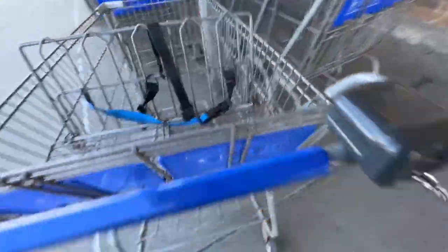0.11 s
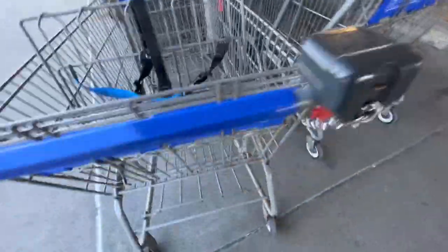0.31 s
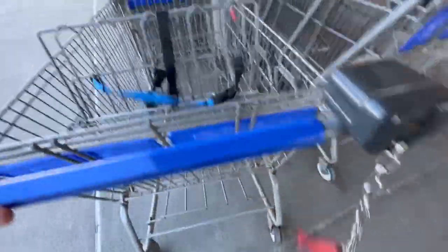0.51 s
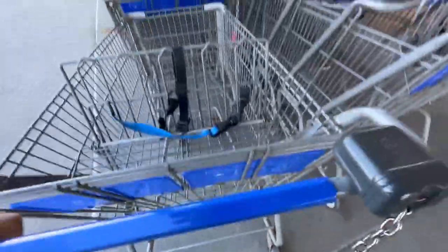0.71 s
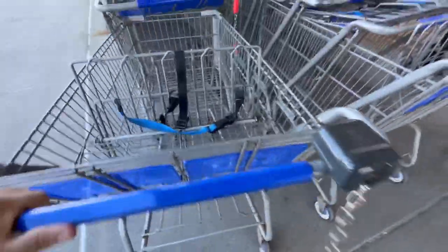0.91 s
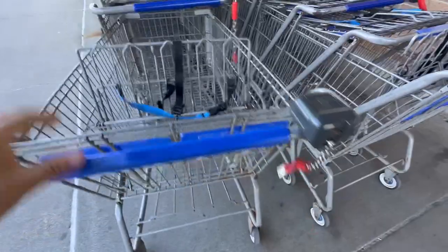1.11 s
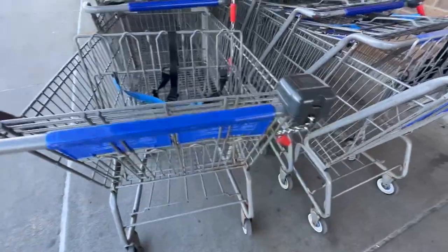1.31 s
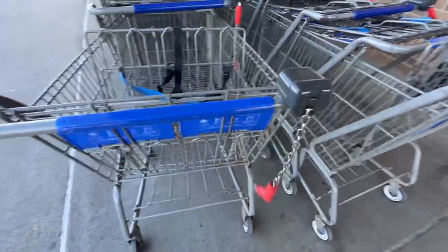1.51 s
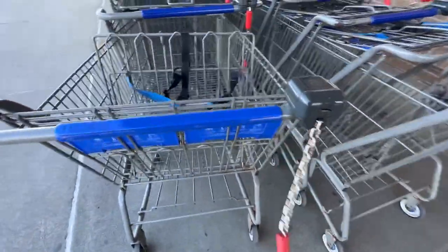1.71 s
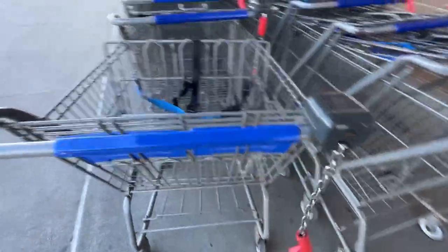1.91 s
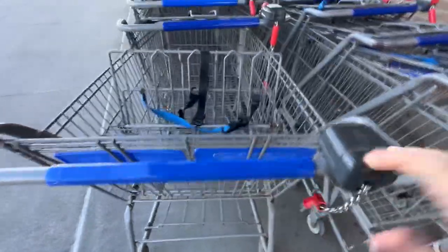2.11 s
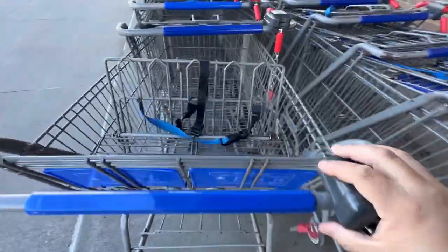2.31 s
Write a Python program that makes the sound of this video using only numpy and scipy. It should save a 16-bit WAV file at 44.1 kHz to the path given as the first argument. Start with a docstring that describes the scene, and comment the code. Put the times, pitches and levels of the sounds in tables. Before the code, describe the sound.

A wire shopping cart slams into a row of nested carts, rattles hard, then its chain clinks

```python
"""A steel wire shopping cart rolls on concrete with a low wheel drone, close to the microphone.
At 0.22 s it bangs into a row of nested carts and rattles; near 0.9 s it is pushed home in a second clatter.
A finger cups the right port: its resonance fades over 1.6-1.8 s, a slip hiss and bump follow at 1.92 s.
A wheel hum swells to 1.9 s; the lock chain, faint at 1.78 s, clinks clearly at 2 s and dies in lesser knocks.
Metal is noise bursts and decaying modes; wheels, hum and air are filtered noise."""
import sys
import numpy as np
from scipy import signal
from scipy.fft import rfft, irfft, next_fast_len
from scipy.io import wavfile

SR = 44100
rng = np.random.default_rng(int(sys.argv[2]) if len(sys.argv) > 2 else 0)


def wrap_up_sound(samples):
    """Save the sound to the file named by the first command line argument, as 16-bit audio."""
    columns = np.atleast_2d(samples).T
    # keep every value between -1 and 1, then stretch to whole-number steps
    tamed = np.clip(columns, -1, 1)
    steps = np.round(tamed * 32767).astype(np.int16)
    wavfile.write(sys.argv[1], SR, steps)


N = 105840
T = np.arange(N) / SR  # s

# Cart shaking. Each row: time in s, then relative levels in dB of frame bars, basket wires, finest treble.
SHAKE = [(0.0, -53.5, -53.5, -53), (0.21, -59.5, -53, -53), (0.222, -31, -46, -45),
         (0.232, -24.5, -30, -31), (0.254, -43, -26, -21), (0.27, -36, -26, -23), (0.412, -23, -25, -24),
         (0.456, -28.5, -27, -29), (0.51, -21.5, -24, -22.5), (0.694, -29.5, -28.5, -28),
         (0.846, -38, -41, -45.5), (0.884, -41.5, -40, -33), (0.896, -33, -32, -23),
         (0.906, -31, -32.5, -43), (0.966, -31.5, -33, -32), (0.982, -25, -25.5, -19),
         (1.026, -25.5, -25, -27), (1.156, -32.5, -32.5, -30.5), (1.166, -31.5, -30.5, -24),
         (1.178, -28, -29.5, -28), (1.21, -29, -32, -34), (1.248, -31.5, -32, -27.5),
         (1.264, -33, -33, -31), (1.314, -32, -32, -30.5), (1.384, -36.5, -36, -39.5),
         (1.472, -40, -44.5, -49), (1.618, -45, -46.5, -55), (1.754, -56.5, -60, -80),
         (1.786, -69, -51.5, -58), (1.856, -68, -59.5, -80), (1.884, -53, -51, -70),
         (1.95, -45.5, -54, -77)]
# Cart striking cart. Each row: start in s, clang level in dB, thud level in dB.
BLOWS = [(0.222, -33, -46), (0.2306, -15.5, -10), (0.251, -28.5, -33), (0.332, -16, -36),
         (0.499, -18.5, -45), (0.521, -19, -19.5), (0.544, -20, -24.5), (0.907, -23, -48),
         (0.978, -19.5, -32), (0.997, -18, -32)]
# Rumble spectrum, also the finger bump. Each row: frequency in Hz, relative density in dB per Hz.
RUMBLE = [(20, -39), (36, -26), (52, -3), (80, 2.5), (120, -9.5), (200, -9.5), (400, -76), (2000, -68)]


def amp(db):
    """Decibels to gain."""
    return 10 ** (np.asarray(db) / 20)


def evened(x):
    """Scales to rms 1."""
    return x / np.sqrt(np.mean(x ** 2) + 1e-20)


def read(points, hz):
    """Reads a table on a log-frequency axis."""
    f, value = np.transpose(points)
    return np.interp(np.log(hz + 1), np.log(f + 1), value)


def curve(table, axis):
    """One column of a time table, for every sample."""
    rows = np.array(table)
    return np.interp(T, rows[:, 0], rows[:, axis])


def add(mix, start_s, sound):
    """Adds a stereo sound in place, cut at the end of the mix."""
    part = mix[:, round(start_s * SR):][:, :sound.shape[1]]
    part += sound[:, :part.shape[1]]


def filtered(x, gain):
    """Filters by a function of frequency."""
    size = next_fast_len(2 * x.shape[-1])
    spectrum = rfft(x, size) * gain(np.fft.rfftfreq(size, 1 / SR))
    return irfft(spectrum, size)[..., :x.shape[-1]]


def coloured(x, points):
    """Gives x a spectrum, at rms 1."""
    return evened(filtered(x, lambda hz: amp(read(points, hz))))


def resonant(x, centre_hz, width_hz):
    """x through one steep resonance, at rms 1."""
    return evened(filtered(x, lambda hz: 1 / (1 + ((hz - centre_hz) / width_hz) ** 4)))


def noise(length):
    """Unrelated white noise for two channels."""
    return rng.standard_normal((2, length))


def ring(modes):
    """Half a second of decaying modes, reaching each port with its own phase."""
    t, out = T[:SR // 2], 0
    for hz, db, t60_s in modes:
        decay = amp(db - 60 * t / np.clip(t60_s, .02, .9))
        out = out + decay * np.sin(2 * np.pi * (hz * t + rng.random((2, 1))))
    return out


def mesh(t60_s, spread_db, count):
    """The ring of a welded mesh: very many modes of random pitch and strength."""
    size = SR // 2
    lines = np.zeros((2, size // 2 + 1), complex)
    bins = rng.integers(50, 8000, count)  # 2 Hz apart: 100 Hz to 16 kHz
    strength = amp(spread_db * rng.standard_normal(count).clip(-2, 2))
    lines[:, bins] = strength * np.exp(2j * np.pi * rng.random((2, count)))
    return evened(irfft(lines, size)) * amp(-60 * T[:size] / t60_s)


def shake_gain(axis):
    """Gain of one SHAKE column; the shaking dies away after the last point."""
    settle_db_per_s = 39.5
    return amp(curve(SHAKE, axis) - settle_db_per_s * np.maximum(T - SHAKE[-1][0], 0))


def paired(x):
    """Stereo width by frequency: bass nearly mono, middle and most treble wide, top nearly mono."""
    # Each row: frequency in Hz, channel likeness (clipped to -1..1): 1 is mono, 0 is wide,
    # negative is out of phase.
    likeness = [(100, 0.93), (220, 0.87), (450, 0.39), (800, -0.28), (1200, -0.073), (2200, 0.13),
                (3000, -0.08), (4000, 0.041), (10000, 0.044), (10900, -1.083), (12300, -1.24),
                (13200, 0.93), (16000, 0.79)]
    mid = filtered(x[0], lambda hz: np.sqrt((1 + read(likeness, hz).clip(-1, 1)) / 2))
    side = filtered(x[1], lambda hz: np.sqrt((1 - read(likeness, hz).clip(-1, 1)) / 2))
    return np.array([mid + side, mid - side])


def air(level_db=-47):
    """Car park air: steady noise, mostly low."""
    # Each row: frequency in Hz, relative density in dB per Hz.
    air_spectrum = [(20, -20), (60, 8.5), (350, 3.5), (800, -9.5), (1500, -6), (3000, -29), (6000, -43),
                    (10000, -68), (16000, -60)]
    return amp(level_db) * coloured(noise(N), air_spectrum)


def wheels(drone_db=0, rumble_db=-1, rumble_top_db=-32):
    """Hard wheels on rough concrete drive the low resonances of the frame."""
    # Each row: time in s, drone level in dB, rumble level in dB (before cap and trim).
    roll = [(0.0, -43, -60), (0.15, -42.5, -65), (0.21, -44, -48), (0.23, -22, -33), (0.28, -29.5, -27),
            (0.33, -31.5, -40), (0.35, -26, -30), (0.47, -37, -39), (0.54, -31, -42), (0.63, -41, -45),
            (0.65, -33.5, -44), (0.81, -43, -42), (1.0, -36, -45), (1.56, -36.5, -40), (1.93, -35.5, -46),
            (2.27, -43.5, -42), (2.28, -41, -43.5), (2.4, -43.5, -38)]
    # Each row: frequency in Hz, relative density in dB per Hz.
    drone_spectrum = [(100, -6), (190, 4), (270, -12), (365, 5), (440, 0.5), (530, -8.5), (670, 2.5),
                      (850, -2.5), (1100, -8.5), (2000, -20), (5000, -51), (16000, -65)]
    drone = amp(curve(roll, axis=1) + drone_db) * coloured(noise(N), drone_spectrum)
    rumble_level_db = np.minimum(curve(roll, axis=2), rumble_top_db) + rumble_db
    return drone + amp(rumble_level_db) * coloured(noise(N), RUMBLE)


def hum(level_db=-41.5, upper_db=-3, peak_s=1.897, swell_s=.12):
    """A wheel hum swells and fades in two resonances of the frame as the cart rolls home."""
    lower = resonant(noise(N), centre_hz=360, width_hz=54)
    upper = resonant(noise(N), centre_hz=710, width_hz=150)
    swell = 1 / (1 + ((T - peak_s) / swell_s) ** 2)
    return amp(level_db) * swell * (lower + amp(upper_db) * upper)


def finger(width_hz=950, slip_db=-35.5, bump_db=-33):
    """The finger slides off the right port: a brief rising hiss and a soft bump."""
    start_s, length_s, from_hz, to_hz = 1.922, 0.03, 8000, 10500
    out, u = np.zeros((2, N)), np.linspace(0, 1, round(length_s * SR))
    carrier = np.exp(2j * np.pi * np.cumsum(from_hz + (to_hz - from_hz) * u) / SR)
    a, b = filtered(noise(len(u)), lambda hz: 1 / (1 + (hz / width_hz) ** 4))
    hiss = evened(((a + 1j * b) * carrier).real)
    bump = coloured(noise(len(u))[0], RUMBLE)
    slip = (amp(slip_db) * hiss + amp(bump_db) * bump) * np.sin(np.pi * u)
    add(out, start_s, np.array([[0], [1]]) * slip)  # right only
    return out


def chain(modes_db=-7, lean_db=8, lean_below_hz=7000):
    """The lock chain swings against the cart; dense and single link modes ring out on the left."""
    # Each row: start in s, level in dB.
    clinks = [(1.778, -59), (1.998, -31.5), (2.017, -35), (2.068, -43.5), (2.119, -47.5), (2.197, -54)]
    # Link modes. Each row: frequency in Hz, level in dB, t60 in s.
    link_modes = [(1480, -7, 0.74), (3391, 0, 0.32), (4290, -12, .4), (5500, -12, .22), (5900, -10, .22),
                  (7130, -1.5, 0.23), (8565, -12, 0.24), (9400, 0, 0.17), (13460, -7, 0.092)]
    # Each row: frequency in Hz, relative density in dB per Hz.
    chain_spectrum = [(600, -27), (1500, 3), (2700, 1.5), (3400, 5.5), (4400, 2), (5000, -7), (5450, 10),
                      (6100, 6), (6700, -10), (7500, 1.5), (9500, 0.5), (12000, -12), (14000, -13),
                      (15500, 2)]
    # Each row: frequency in Hz, t60 in s.
    chain_t60 = [(1000, 1), (4000, 0.62), (9000, 0.29), (15000, 0.17)]
    out = np.zeros((2, N))
    for start_s, db in clinks:
        steady = coloured(mesh(t60_s=64, spread_db=0, count=1200), chain_spectrum)
        hz, t, z = signal.stft(steady, SR, nperseg=256)
        z = z * amp(-60 * t / read(chain_t60, hz)[:, None])  # treble dies first
        tail = signal.istft(z, SR, nperseg=256)[1][:, :SR // 2]
        add(out, start_s, amp(db) * (tail + amp(modes_db) * ring(link_modes)))
    right_cut_db = np.array([[0], [-lean_db]])
    return filtered(paired(out), lambda hz: amp(right_cut_db / (1 + (hz / lean_below_hz) ** 8)))


def ticks(ring_db=-22, hold_s=0.0015, t60_s=0.011, width_octaves=0.45):
    """Wire and chain links snap singly: short band-limited bursts with a faint metallic ring."""
    # Each row: start in s, level in dB, centre in Hz, left minus right in dB.
    snaps = [(0.093, -34, 3200, 0), (0.8943, -14, 13100, -2), (1.1645, -23, 14700, -3),
             (1.4445, -21, 8450, 8), (1.4482, -23, 5030, 17), (1.4889, -31, 9000, -3),
             (1.5218, -35, 9000, -3), (1.5653, -26.5, 6340, 17.5), (1.8755, -41, 6000, 2),
             (1.914, -37, 4000, -15), (1.9622, -24.5, 3130, 8), (1.98, -40, 4440, 4)]
    out, t = np.zeros((2, N)), T[:SR // 2]
    for start_s, db, centre_hz, lean_db in snaps:
        snap = noise(len(t)) * amp(-60 * np.maximum(t - hold_s, 0) / t60_s)
        snap = snap + amp(ring_db) * mesh(t60_s=0.1, spread_db=3.5, count=300)
        snap = filtered(snap, lambda hz: 1 / (1 + (np.log2((hz + 1) / centre_hz) / width_octaves) ** 2) ** 1.65)
        add(out, start_s, amp(db + np.array([[lean_db], [-lean_db]]) / 2) * snap)
    return out


def thuds(rise_s=0.0061):
    """The blows jolt the chassis: decaying low modes, alike in both channels."""
    # Each row: frequency in Hz, level in dB, t60 in s.
    chassis_modes = [(56, -10.5, 0.38), (97, -5.5, 0.14), (139.2, -4.5, .12), (187, -2.5, 0.096),
                     (284, -8, 0.054)]
    out, t = np.zeros((2, N)), T[:SR // 2]
    jolt = sum(amp(db - 60 * t / t60_s) * np.sin(2 * np.pi * hz * t) for hz, db, t60_s in chassis_modes)
    jolt = jolt * (1 - np.exp(-t / rise_s))
    for start_s, _, db in BLOWS:
        add(out, start_s, -amp(db) * np.array([jolt, jolt]))
    return out


def clangs(crack_t60_s=0.041, ring_db=-6):
    """Each blow cracks (noise burst) and leaves the whole basket ringing (dense modes)."""
    # Each row: frequency in Hz, relative density in dB per Hz.
    clang_spectrum = [(100, -37), (200, 5), (600, -5), (1900, 5.5), (3500, 4.5), (8000, -8), (16000, 1.5)]
    out, t = np.zeros((2, N)), T[:SR // 2]
    for start_s, db, _ in BLOWS:
        crack = coloured(noise(len(t)), clang_spectrum) * amp(-60 * t / crack_t60_s)
        tail = mesh(t60_s=0.63, spread_db=4, count=2000)
        tail = filtered(tail, lambda hz: amp(read(clang_spectrum, hz)))
        add(out, start_s, amp(db) * (crack + amp(ring_db) * tail))
    return out


def bar_rings(t60_s=.12, split_hz=45):
    """Single bars struck hard ring out, each with a close pair of modes."""
    # Each row: start in s, frequency in Hz, level in dB.
    struck_bars = [(0.222, 1930, -25), (0.355, 1130, -27), (0.392, 1160, -25), (0.418, 1180, -25)]
    out = np.zeros((2, N))
    for start_s, hz, db in struck_bars:
        add(out, start_s, ring([(hz, db, t60_s), (hz - split_hz, db - 4, t60_s)]))
    return out


def knocks(count=48, level_db=-4.5, knocks_per_s=300, spread_db=5, t60_s=0.061):
    """Single bars knock and ping, each at its own pitch, as hard as the frame shakes."""
    low_hz, high_hz = 754.4, 4202
    out, t = np.zeros((2, N)), T[:SR // 8]
    for hz in np.geomspace(low_hz, high_hz, count):
        sizes = amp(spread_db * np.minimum(rng.exponential(1, N), 3))
        hits = sizes * (rng.random(N) < knocks_per_s / count / SR)
        ping = amp(-60 * t / t60_s) * np.sin(2 * np.pi * (hz * t + rng.random((2, 1))))
        out += signal.oaconvolve(hits[None], ping, axes=1)[:, :N]
    return shake_gain(axis=1) * amp(level_db) * evened(out)


def rattle(snap_t60_s=0.0073, mesh_db=0, basket_db=-13, bars_db=0.0, wires_db=3, fizz_db=1, shudder_db=-21.5):
    """Loose wires chatter against each other; every contact snaps and rings the basket."""
    # Strongest basket modes. Each row: frequency in Hz, level in dB, t60 in s.
    basket_modes = [(1112, 2, 0.087), (1266, 2, 0.062), (1492, -2.5, .2), (1830, -7, .2), (2232, 0.5, 0.18),
                    (8770, -3, .2), (8911, -5, .2), (8940, -9, .2), (9020, -4, .2), (9542, 8, .2),
                    (13800, 3, .2), (13600, -1, .2)]
    # Spectra of frame bars, basket wires, finest treble. Each row: frequency in Hz, relative dB per Hz.
    bar_spectrum = [(60, -3), (130, 1.5), (200, 4.5), (300, -3), (520, 0.5), (800, -3), (1100, 5),
                    (1800, -0.5), (2400, -0.5), (3200, -13), (5000, -40.5), (16000, -59.5)]
    wire_spectrum = [(500, -22.5), (1800, -13.5), (3100, -2.5), (4500, 1), (6000, 0), (7500, -2.5),
                     (9000, -5.5), (10300, -5.5), (12000, -30.5), (16000, -22)]
    fizz_spectrum = [(3000, -57), (8000, -16.5), (10500, -1), (12000, 0), (14000, 1), (16000, 0)]
    panels, contacts_per_s, spread_db = 4, 520, 3  # rate is per panel
    chatter, t = 0, T[:SR // 2]
    for _ in range(panels):  # each panel of the basket has its own ring
        sizes = amp(spread_db * np.minimum(rng.exponential(1, N), 4)) * rng.choice([-1, 1], N)
        contacts = sizes * (rng.random(N) < contacts_per_s / SR)
        body = evened(noise(len(t)) * amp(-60 * t / snap_t60_s))
        body = body + amp(mesh_db) * evened(mesh(t60_s=0.47, spread_db=3, count=2000))
        body = body + amp(basket_db) * evened(ring(basket_modes))
        chatter = chatter + irfft(rfft(contacts) * rfft(body, N), N)  # circular convolution
    bars = amp(bars_db) * coloured(chatter, bar_spectrum)
    shudder = amp(shudder_db) * resonant(chatter, centre_hz=192, width_hz=67)  # the frame booms along
    wires = amp(wires_db) * coloured(chatter, wire_spectrum)
    fizz = amp(fizz_db) * coloured(chatter, fizz_spectrum)
    return shake_gain(1) * (bars + shudder) + shake_gain(2) * wires + shake_gain(3) * fizz


def placed(x, port_hz=9170, port_width_hz=1260, port_db=11.5):
    """The cart sits a little left; the cupped right port resonates, fading over 1.6-1.8 s."""
    # Each row: frequency in Hz, left minus right in dB.
    lean = [(200, -0.5), (600, 1.5), (1100, 3.5), (2200, -0.5), (3500, 2), (5800, 5), (7500, 0),
            (10500, 0.5)]
    x = filtered(x, lambda hz: amp(np.array([[.5], [-.5]]) * read(lean, hz)))
    cupped = filtered(x[1], lambda hz: amp(port_db * np.exp(-((hz - port_hz) / port_width_hz) ** 2)))
    cover = np.interp(T, [1.6, 1.8], [1, 0])
    return np.array([x[0], x[1] + cover * (cupped - x[1])])


def scene():
    """Open air and wheels, finger, chain, and the cart."""
    background = paired(wheels() + hum() + air())
    cart = placed(paired(rattle() + knocks() + bar_rings() + clangs())) + thuds()
    return background + finger() + chain() + ticks() + cart


def record(dry, peak_limit=.92, bass_cut_hz=40, edge_hz=15850):
    """Soft ceiling, bass roll-off and band limit of the recorder."""
    dry = dry / (1 + (dry / peak_limit) ** 6) ** (1 / 6)
    bass_cut = signal.butter(N=4, Wn=bass_cut_hz, btype="high", fs=SR, output="sos")
    dry = signal.sosfilt(bass_cut, dry)
    band_limit = signal.firwin(511, edge_hz, window=("kaiser", 9), fs=SR)
    return signal.oaconvolve(dry, band_limit[None], "same")


dry = scene()
out = record(dry)
wrap_up_sound(out)
```